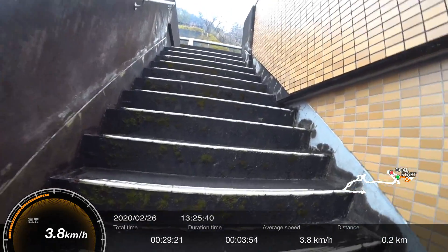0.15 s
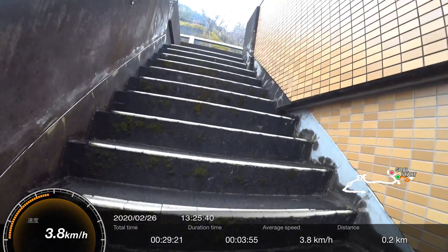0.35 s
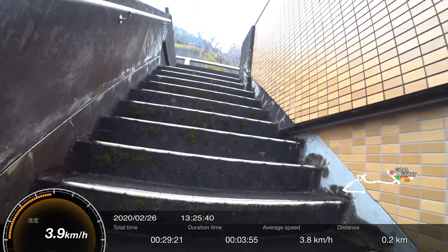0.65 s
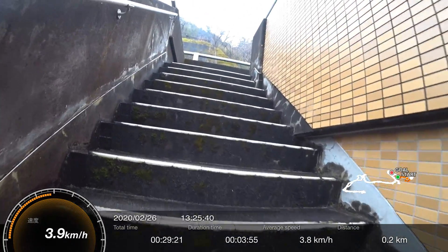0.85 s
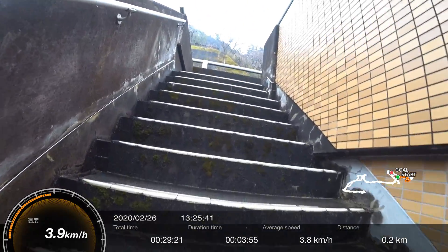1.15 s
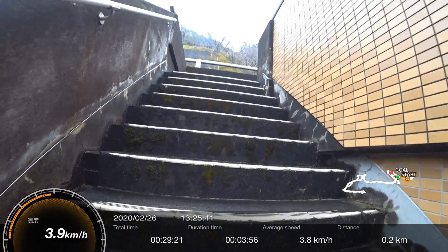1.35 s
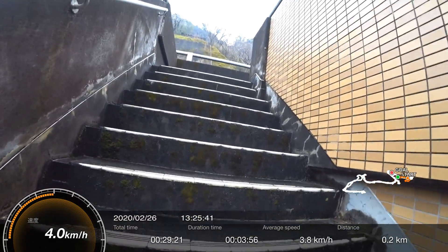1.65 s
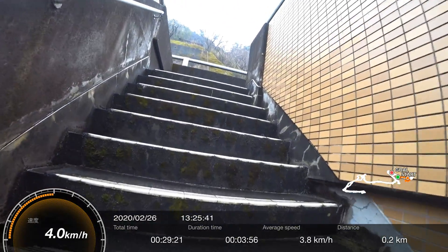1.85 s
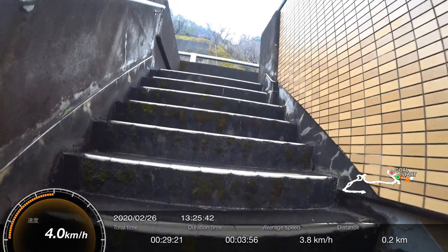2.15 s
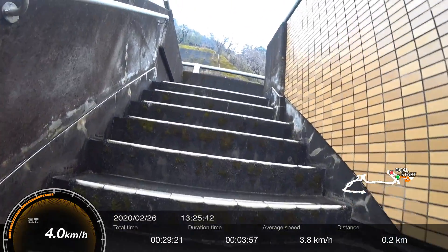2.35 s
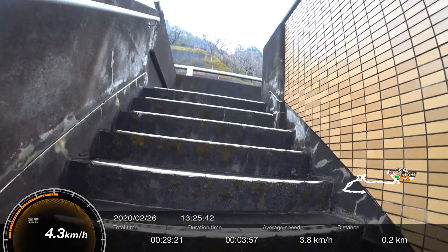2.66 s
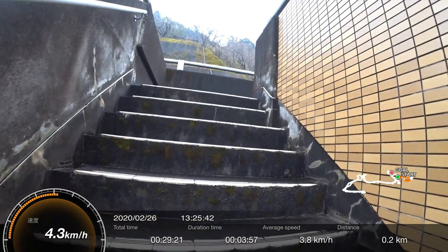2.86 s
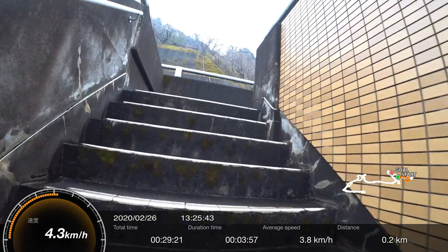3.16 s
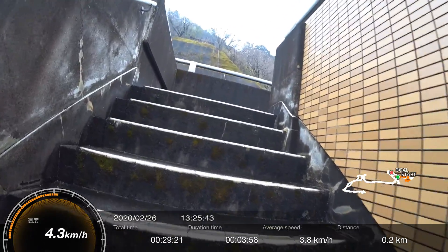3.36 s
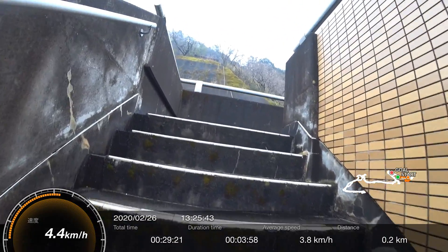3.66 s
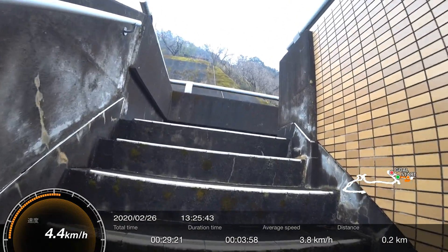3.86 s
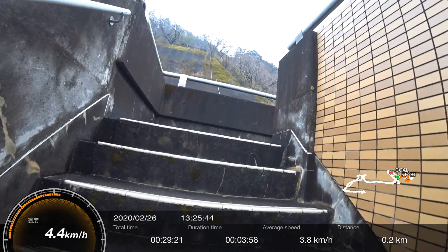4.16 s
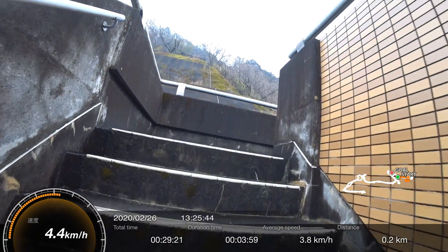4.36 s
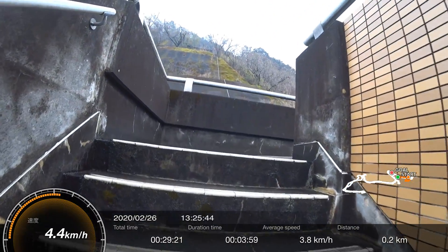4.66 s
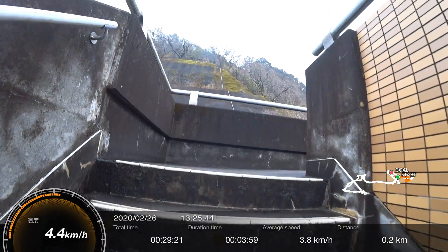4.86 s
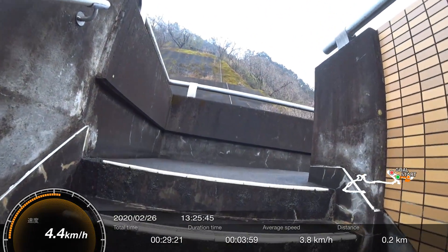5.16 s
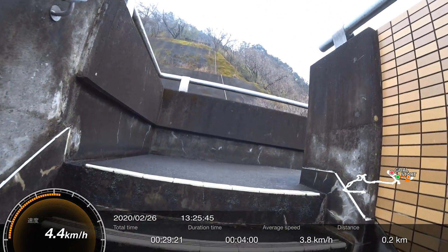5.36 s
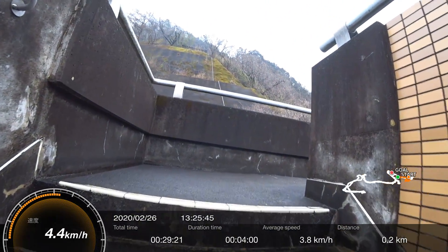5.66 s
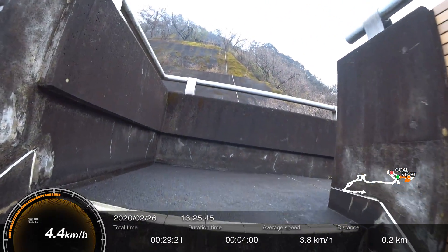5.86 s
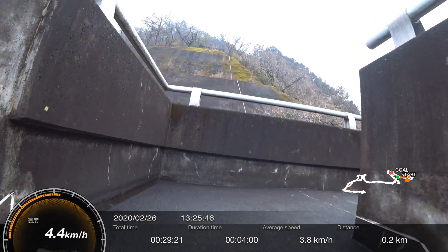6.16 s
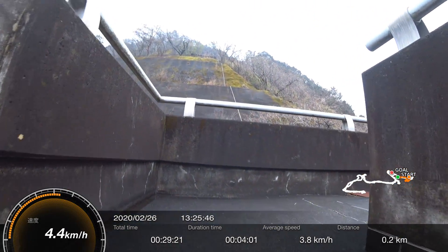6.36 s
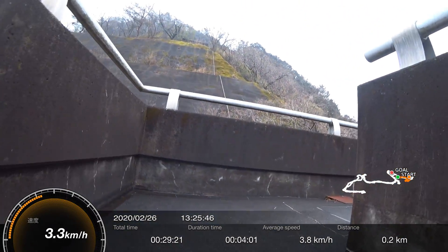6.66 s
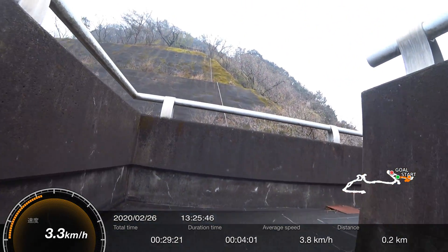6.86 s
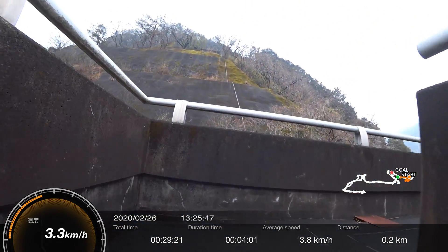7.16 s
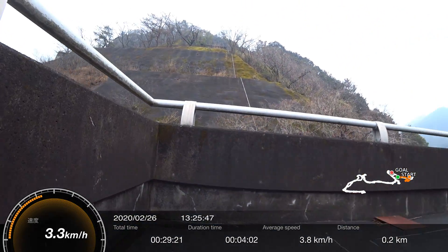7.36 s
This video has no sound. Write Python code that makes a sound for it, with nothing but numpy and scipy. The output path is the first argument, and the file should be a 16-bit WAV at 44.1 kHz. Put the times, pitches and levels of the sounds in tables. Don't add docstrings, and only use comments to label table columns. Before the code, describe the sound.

One person climbs open concrete stairs in hard-soled shoes, about one step every 0.6 seconds, eleven in all. Slaps vary from dull and soft to bright and loud, each with a short hard rattle between the walls. Small scuffs, jacket swishes, high strap creaks and light gear taps fill the gaps. A quiet town hiss and low hum lie behind. The body-worn microphone is close, in stereo.

```python
import sys
import numpy as np
from scipy import signal
from scipy.fft import rfft, irfft, next_fast_len
from scipy.io import wavfile
from scipy.ndimage import uniform_filter1d

SR = 44100
rng = np.random.default_rng(int(sys.argv[2]) if len(sys.argv) > 2 else 0)


def gain_from_db(level_db):
    decades = np.asarray(level_db, float) / 20
    return 10 ** decades


def wrap_up_sound(samples):
    columns = np.atleast_2d(samples).T
    tamed = np.clip(columns, -1, 1)
    steps = np.round(tamed * 32767).astype(np.int16)
    wavfile.write(sys.argv[1], SR, steps)


N = 331191


def along(table, hz):
    f, v = np.transpose(table)
    return np.interp(np.log(np.maximum(hz, 1)), np.log(f), v)


def curves(table):
    s, *columns = np.transpose(table)
    return [np.interp(np.arange(N) / SR, s, c) for c in columns]


def walk(rate, size):
    hold = max(int(SR / rate), 1)
    levels = np.repeat(rng.standard_normal(size // hold + 1), hold)
    return 1.14 * uniform_filter1d(uniform_filter1d(levels, hold), hold)[:size]


def hump(hz, centre_hz, width_hz):
    return 1 / (1 + ((hz - centre_hz) / width_hz) ** 2)


def stereo_noise(size, colour, alike):
    hz = np.arange(size // 2 + 1) * SR / size
    mid, side = rfft(rng.standard_normal((2, size)))
    likeness = np.clip(along(alike, hz), 0, 1)
    mid, side = mid * np.sqrt(1 + likeness), side * np.sqrt(1 - likeness)
    return gain_from_db(along(colour, hz)) * np.array([mid + side, mid - side]), hz


def bands(spectrum, hz, size):
    for centre in 42 * 2 ** np.arange(0, 8.5, .5):
        away = np.clip(2 * np.log2(np.maximum(hz, 1) / centre), -1, 1)
        yield centre, irfft(spectrum * np.cos(np.pi / 2 * away) ** 2, size)


def wash(colour, alike, swell_db, flicker_db, flicker_rate, bass_db=0):
    size = next_fast_len(N)
    swell = swell_db * walk(1.64, N)
    out = 0
    for centre, band in bands(*stereo_noise(size, colour, alike), size):
        flicker = flicker_db * walk(flicker_rate, N)
        out = out + band[:, :N] * gain_from_db(swell + flicker + bass_db * (centre < 600))
    return out / np.sqrt(np.mean(out ** 2))


def town():
    # (time [s], hiss level [dB])
    hiss_course = [(0.0, -56), (0.3, -58.5), (1.09, -58.5), (1.53, -59), (1.75, -58.5), (3.14, -61),
                   (4.8, -61), (5.5, -60.5), (7.51, -60.5)]
    # (frequency [Hz], density [dB per Hz])
    town_colour = [(25, -34), (60, -18.5), (130, -19.5), (240, -9.5), (320, -2), (400, -3.5), (520, -3.5),
                   (800, -7), (1300, -4.5), (2500, -11), (5000, -19), (9500, -29.5), (11500, -22)]
    # (frequency [Hz], left-right likeness [0-1])
    town_alike = [(60, 0.62), (270, 0.94), (570, 0.57), (1200, 0.03), (2500, 0.04), (5300, .45),
                  (11000, 0.3)]
    hiss_db, = curves(hiss_course)
    drone_db = -60.5 + 0.22 * (hiss_db - hiss_db.mean())
    return wash(town_colour, town_alike, 0.83, 1.36, 9, drone_db - hiss_db) * gain_from_db(hiss_db + 5.0)


def hum():
    # (frequency [Hz], level [dB], change [dB/s])
    hum_lines = [
        (50, -77, -2.5),
        (101, -102, 2.5),
        (165, -80, 0),
    ]
    t = np.arange(N) / SR
    out = np.zeros(N)
    for hz, db, db_per_s in hum_lines:
        level_db = db + db_per_s * t - 2.0 + 1.2 * walk(4.1, N)
        phase = 2 * np.pi * hz * t + 1.06 * walk(2.44, N)
        out += np.sqrt(2) * gain_from_db(level_db) * np.sin(phase)
    return out


def whistle(rows, rough_db):
    first, last = rows[0], rows[-1]
    fade_in, fade_out = (first[0] - .004, first[1], -110), (last[0] + .004, last[1], -110)
    hz, db = curves([fade_in] + list(rows) + [fade_out])
    hz = hz * (1 + 0.0051 * walk(270, N))
    return np.sqrt(2) * gain_from_db(db + rough_db * walk(150, N)) * np.sin(2 * np.pi * np.cumsum(hz) / SR)


def bird():
    # (time [s], pitch [Hz], level [dB])
    chips = [
        [(6.042, 9700, -77), (6.045, 8900, -61), (6.048, 8500, -61), (6.052, 9300, -58), (6.056, 9900, -54),
         (6.06, 10200, -74)],
        [(6.07, 9200, -74), (6.095, 9600, -73), (6.115, 9700, -74)],
        [(2.02, 9200, -73), (2.034, 9300, -69)],
        [(2.072, 9900, -73), (2.083, 9400, -64), (2.095, 9400, -70)],
    ]
    return sum(whistle(rows, rough_db=2.5) for rows in chips)


def swings():
    # (time [s], level [dB], back swing level [dB])
    arm_swings = [
        (.42, -63.5, -71),
        (1.71, -66.5, -71.5),
        (2.96, -66.5, -71),
        (4.18, -65, -73.5),
        (5.46, -67.5, -73.5),
        (6.77, -68, -77),
    ]
    t = np.arange(N) / SR
    power = gain_from_db(-73.5 - .5 * t) ** 2
    for s, db, back_db in arm_swings:
        power = power + gain_from_db(db) ** 2 * np.exp(-((t - s) / 0.068) ** 2)
        power = power + gain_from_db(back_db) ** 2 * np.exp(-((t - s - 0.3) / .12) ** 2)
    return np.sqrt(power)


def jacket():
    # (frequency [Hz], density [dB per Hz])
    cloth_colour = [(300, -26), (1000, -13.5), (2800, -5.5), (5000, -6.5), (8000, -9), (11500, -12.5)]
    grain = gain_from_db(1.35 * walk(700, N))
    cloth = wash(cloth_colour, [(300, 0.89), (2000, 0.99), (10000, 0.25)], 0.24, 1.8, 25) * grain
    return cloth * swings() * gain_from_db(10.0 + np.array([[1.1], [-1.1]]))


def slips():
    # (time [s], length [s], first slip level [dB], change [dB per slip])
    creaks = [(0.138, .036, -46.5, -8), (0.377, .004, -53, -5), (.702, .072, -54.5, -1),
              (1.556, .004, -65, -3), (1.583, .004, -59, -3), (1.949, .012, -52.5, -9),
              (2.171, .046, -45, -3), (3.209, .024, -53, -5), (3.269, .034, -51, -2), (3.364, .02, -62, 2),
              (4.036, .016, -66, -3), (4.126, .004, -64, -5), (4.153, .012, -57, -4),
              (4.395, .018, -57, -2), (4.444, .032, -61, 2), (4.499, .024, -52, -2), (5.16, .014, -66, 5),
              (5.188, .036, -53.5, -6), (5.241, .004, -58, -3), (5.451, .004, -56, -3),
              (5.487, .032, -57, -1.5), (5.692, .034, -62, .7), (5.737, .044, -56, -1),
              (5.867, .004, -59, -3), (5.912, .004, -60, -3), (7.008, .056, -60, -3),
              (7.109, .04, -56.5, -1)]
    gap_s, most = .0105, 8
    s, length, db, change_db = np.transpose(creaks)[:, :, None]
    jitter, scatter = rng.standard_normal((2, len(creaks), most))
    k = np.arange(most)
    inside = k * gap_s <= length
    later = k > 0
    times = s + gap_s * (k + .2 * jitter * later)
    levels_db = db + change_db * k + 2.5 * scatter * later
    return times[inside], levels_db[inside]


def strap():
    # (pitch ratio [1], level [dB])
    resonances = [
        (1.001, -2),
        (.985, -5),
        (.955, -24),
        (1.045, -12),
        (0.43, -19),
    ]
    main_hz, slip_s = 7210, 0.0036
    s, db = slips()
    ratio, share_db = np.transpose(resonances)
    t = np.arange(-300, 900) / SR
    shape = np.exp(-(t / slip_s) ** 8) + 0.5 * (t > 0) * np.exp(-t / 0.027)
    out = np.zeros(N + 900)
    for start, gain in zip(s, gain_from_db(db - 2.5)):
        drift, phase = rng.standard_normal((2, len(ratio)))
        hz = main_hz * ratio * (1 + 0.0052 * drift)
        tone = gain_from_db(share_db) @ np.sin(2 * np.pi * (hz[:, None] * t + phase[:, None]))
        i = int(start * SR) - 300
        out[i:i + 1200] += gain * shape * tone
    return out[:N] * gain_from_db(np.array([[1.2], [-1.2]]))


def rubber():
    # (time [s], pitch [Hz], level [dB])
    squeals = [
        [(.958, 5290, -59), (.968, 5280, -62), (.986, 5250, -51), (.998, 5160, -64), (1.015, 5230, -67),
         (1.045, 5270, -63), (1.078, 5250, -69)],
        [(1.675, 5300, -68), (1.69, 5280, -58), (1.705, 5250, -68)],
    ]
    return sum(whistle(rows, rough_db=3) for rows in squeals)


def taps():
    # (time [s], level [dB], pitch [Hz], time to fall 60 dB [s])
    small_taps = [(0.351, -48, 950, .05), (1.083, -47, 700, .04), (1.086, -51, 1050, .04),
                  (2.113, -44.5, 540, 0.045), (2.95, -53, 2330, .06), (2.952, -52, 2850, .06),
                  (3.389, -49, 1730, .06), (5.488, -51, 2900, .05), (5.803, -53, 2700, .04),
                  (5.852, -56, 3500, 0.045), (6.794, -50, 2600, .04)]
    t, out = np.arange(4000) / SR, np.zeros(N)
    for s, db, hz, t60 in small_taps:
        pair = np.sin(2 * np.pi * hz * t) + 0.46 * np.sin(2 * np.pi * 1.13 * hz * t)
        i = int(s * SR)
        out[i:i + 4000] += gain_from_db(db - 60 * t / t60) * (1 - np.exp(-t / .001)) * pair
    return out


def contacts(size, roll):
    chance = rng.random(size)
    hits = (chance < 300 / SR) * gain_from_db(4.1 * rng.standard_normal(size))
    hits[[0, int(roll * SR)]] = 1.34
    return 1.5 + signal.lfilter([1], [1, -np.exp(-1 / (0.0011 * SR))], hits)


def footfall(parts_db, tread, pan_db, roll_ms, shape):
    # (frequency [Hz], density [dB per Hz])
    slap_colour = [(60, -18), (150, -17), (470, -4), (900, -8), (1500, -7.5), (2200, -4.5), (3500, -6),
                   (5800, -14), (9600, -27.5), (11500, -26.5)]
    # (frequency [Hz], left-right likeness [0-1])
    step_alike = [(100, 0.98), (500, 0.95), (1200, 0.69), (5000, 0.65), (11000, 0.35)]
    # (frequency [Hz], share of the lean to the left [1])
    lean_share = [(100, .05), (1000, 0.48), (3000, 0.77), (10000, 1.6)]
    # (frequency [Hz], factor on the early echo time [1])
    linger = [(100, 0.61), (500, 1.84), (1200, 1.02), (2500, 0.92), (5000, 0.87), (10000, 1.23)]
    # (frequency [Hz], stairwell tail level [dB])
    tail_colour = [(150, -1), (550, 10.5), (1300, 9.5), (3000, 4), (8000, 2.5)]
    part_edges = [400, 1400, 4500]
    slap_hz, thud_hz, knock_hz, echo_hz, ring_db = tread
    t60, tail_db, landing_db = shape
    size = 10240
    t, roll = np.arange(size) / SR, max(roll_ms, .2) / 1000
    spectrum, hz = stereo_noise(size, slap_colour, step_alike)
    shoe = 6.0 * hump(hz, slap_hz, 900) + 13.0 * hump(hz, thud_hz, 60)
    shoe = shoe + ring_db * hump(hz, 2052, 110) + 5.8 * hump(hz, knock_hz, 53)
    shoe = shoe + 2.83 * walk(1600, len(hz))
    lean = pan_db * along(lean_share, hz) * np.array([[.5], [-.5]])
    clumps = contacts(size, roll)
    landing = gain_from_db(landing_db * np.maximum(1 - t / roll, 0))
    late = np.maximum(t - roll - .002, 0)
    snap = 1.47 * gain_from_db(-60 * late / 0.047)
    parts = np.zeros((4, 2, size))
    for centre, band in bands(spectrum * gain_from_db(shoe + lean), hz, size):
        power = band ** 2
        local = uniform_filter1d(power, int(8 * SR / centre) + 90)
        band = band * (power.mean(axis=1, keepdims=True) / local) ** 0.26
        rise = 1 - np.exp(-t / (.00015 + 0.6 / centre))
        early = gain_from_db(-60 * late / (t60 * along(linger, centre))) + snap
        tail = gain_from_db(tail_db + along(tail_colour, centre) - 60 * t / 0.86)
        sharp = clumps ** min(centre / 900, 1)
        parts[np.searchsorted(part_edges, centre)] += band * rise * (landing * early * sharp + tail)
    echo = irfft(spectrum * gain_from_db(lean) * hump(hz, echo_hz, 75), size)
    parts[2] += echo * (1 - np.exp(-t / 0.0069)) * gain_from_db(tail_db + 26.5 - 60 * t / 0.25)
    start_level = np.sqrt(np.mean(parts[:, :, :600].mean(axis=1) ** 2, axis=1))
    whole = np.tensordot(gain_from_db(np.array(parts_db)) / start_level, parts, 1)
    return whole * np.hanning(2 * size)[size:] ** 0.19


def steps():
    # (time [s], slap level [dB], thud level [dB], grit level [dB], roll [ms])
    soles = [(0.582, -42.5, -66, -55, 2.9), (1.2379, -26, -39.5, -41.5, 3.45),
             (1.829, -37.5, -64, -43, 10.1), (2.448, -23.5, -41.5, -33, 4.7),
             (3.1025, -30.5, -48, -42, 2.07), (3.7326, -30.5, -46.5, -44, 5.1),
             (4.325, -38.5, -62, -51.5, 9.5), (4.9538, -25, -41.5, -29, 2.6),
             (5.6283, -35.5, -56, -47, 2.2), (6.2559, -29, -62, -37, 13.3),
             (6.9404, -28, -42.5, -46.5, 0.92)]
    # (slap [Hz], thud [Hz], knock [Hz], flutter [Hz], ring level [dB])
    sole_treads = [(1510, 200, 570, 2900, -14), (1960, 317, 526, 1240, 4.5), (2970, 280, 1360, 2400, 3),
                   (3350, 323, 1200, 2020, 13), (1940, 263, 760, 3120, 2), (2220, 190, 920, 2610, 8),
                   (2210, 220, 686, 1540, -2), (3360, 350, 580, 2850, -4.5), (1510, 320, 910, 1550, -10),
                   (3070, 330, 566, 2700, 1), (2600, 204, 575, 2200, 7)]
    # (time [s], slap level [dB], knock level [dB], grit level [dB], slap [Hz])
    scuffs = [(0.352, -69, -54.5, -69, 1510), (0.662, -50.5, -55, -49.5, 2910),
              (0.9405, -52, -53, -55.5, 1690), (2.2887, -65, -58, -80, 1510),
              (3.3885, -56.5, -52, -67, 1670), (4.49, -62, -69, -63, 1510),
              (4.7387, -52.5, -51.5, -55, 1510), (5.9475, -56.5, -53.5, -72, 1770),
              (6.9117, -69, -82, -66, 1510), (6.9775, -44.5, -66, -66, 2900), (6.988, -56, -72, -60, 2490),
              (7.2213, -50.5, -51, -57.5, 3590)]
    # (thud [Hz], knock [Hz], flutter [Hz], ring level [dB])
    scuff_tread = (310, 760, 2300, 2)
    # (time for the echo to fall 60 dB [s], tail level [dB], first touch level [dB])
    sole_shape = (.135, -21, -4)
    # (time for the echo to fall 60 dB [s], tail level [dB], first touch level [dB])
    scuff_shape = (0.14, -23, 0)
    falls = []
    for (s, slap, thud, grit, roll_ms), tread in zip(soles, sole_treads):
        knock = -36.5 + 0.66 * (slap + 31) - 2 * (tread[0] - 2300) / 1000
        falls.append((s, (thud, knock, slap, grit), roll_ms, tread, sole_shape))
    for s, slap, knock, grit, slap_hz in scuffs:
        falls.append((s, (knock - 22, knock, slap, grit), 1.6, (slap_hz, *scuff_tread), scuff_shape))
    out = np.zeros((2, N + SR))
    for s, parts_db, roll_ms, tread, shape in falls:
        pan_db = 4 + 0.17 * (parts_db[3] - parts_db[2])
        sound = footfall(parts_db, tread, pan_db, roll_ms, shape)
        i = int(s * SR)
        out[:, i:i + sound.shape[1]] += sound
    return signal.sosfilt(signal.butter(3, 92, "high", fs=SR, output="sos"), out[:, :N])


def scene():
    behind = town() + hum() + bird()
    climber = jacket() + strap() + rubber() + taps() + steps()
    return behind + climber


def band_limit(x):
    return signal.sosfilt(signal.butter(12, 11850, fs=SR, output="sos"), x)


def record(dry):
    treble_cut = signal.ellip(12, .3, 38, 10980, fs=SR, output="sos")
    mix = signal.sosfilt(treble_cut, dry)
    return band_limit(mix)


dry = scene()
out = record(dry)
wrap_up_sound(out)
```